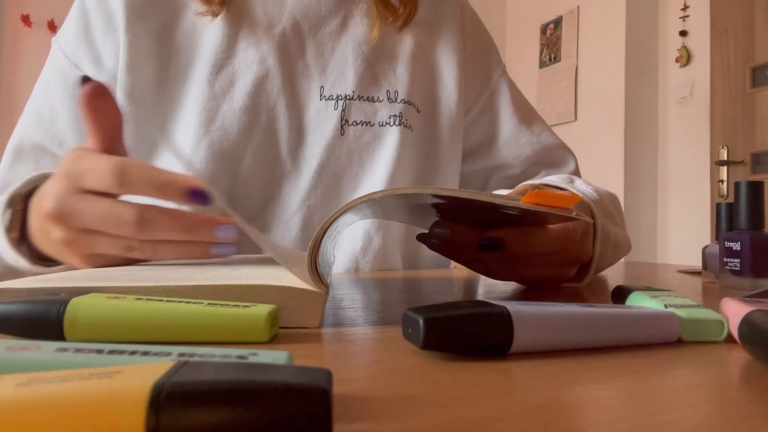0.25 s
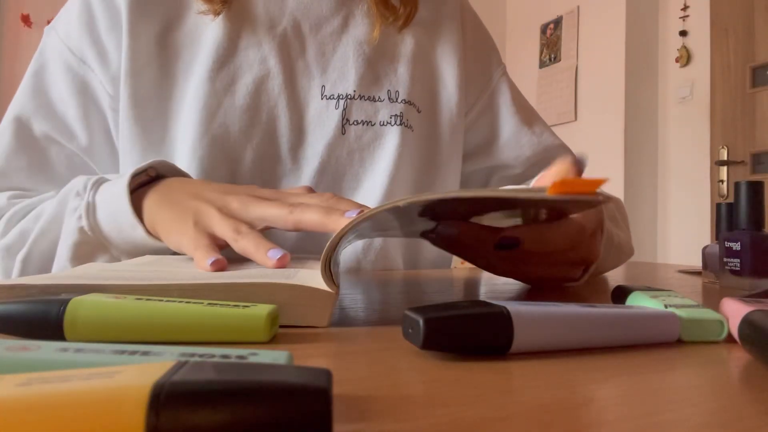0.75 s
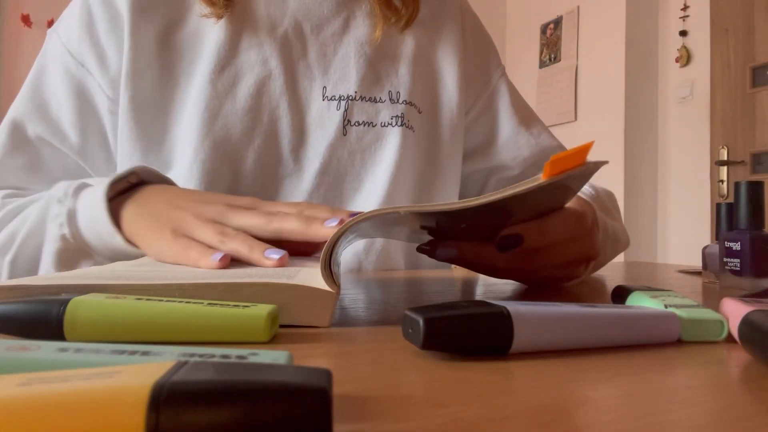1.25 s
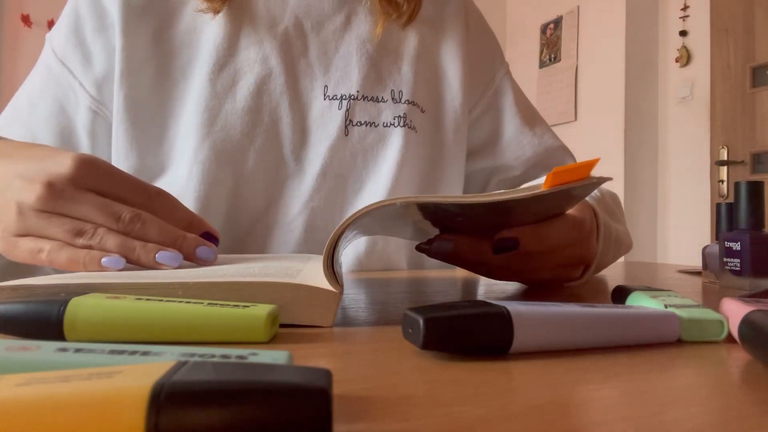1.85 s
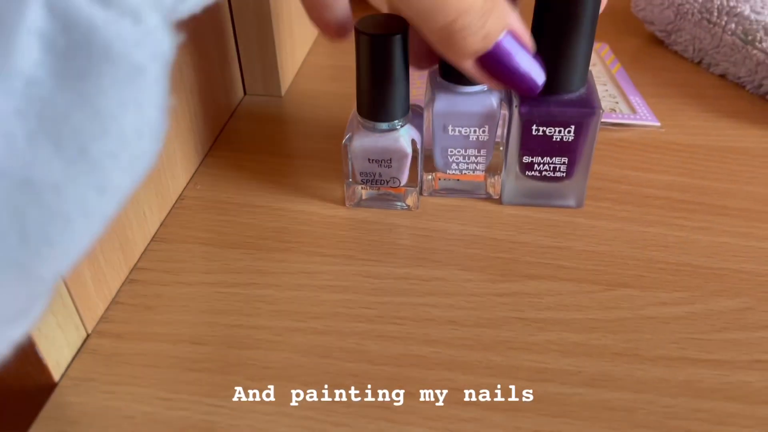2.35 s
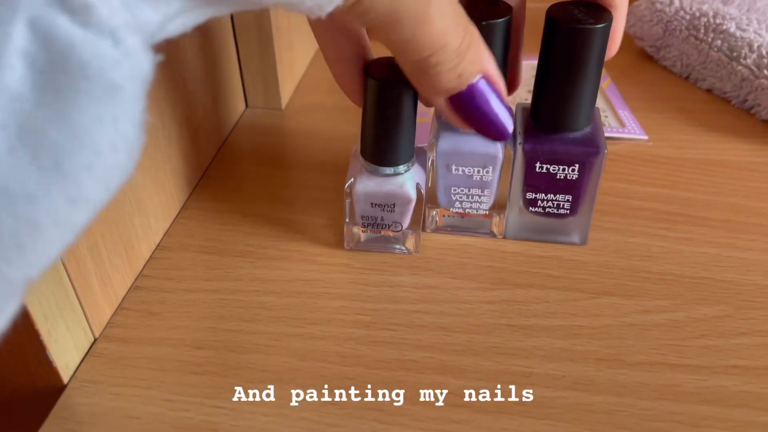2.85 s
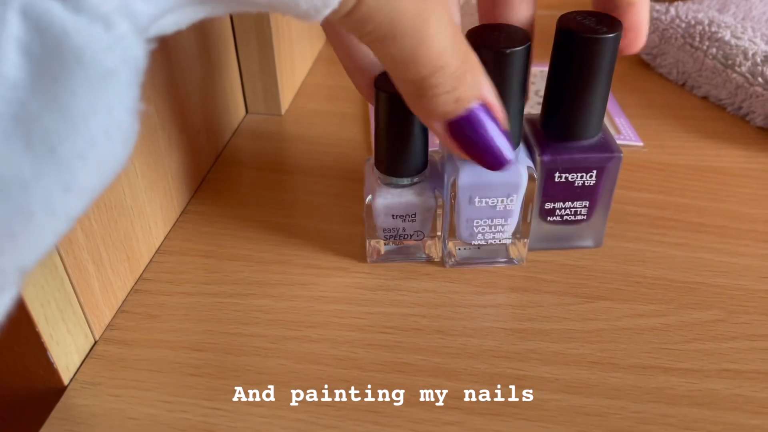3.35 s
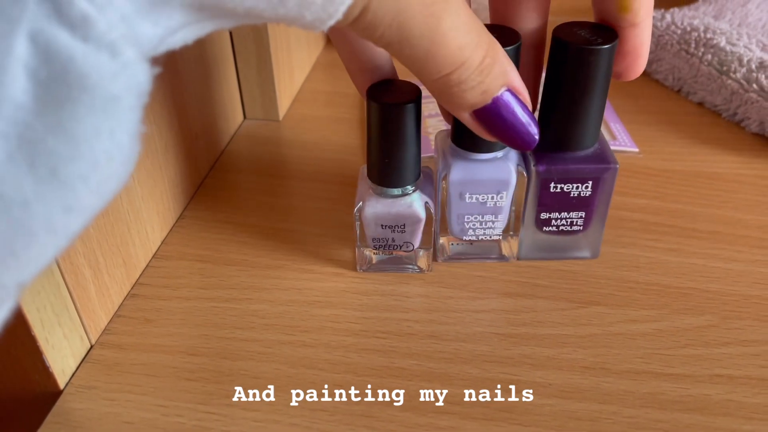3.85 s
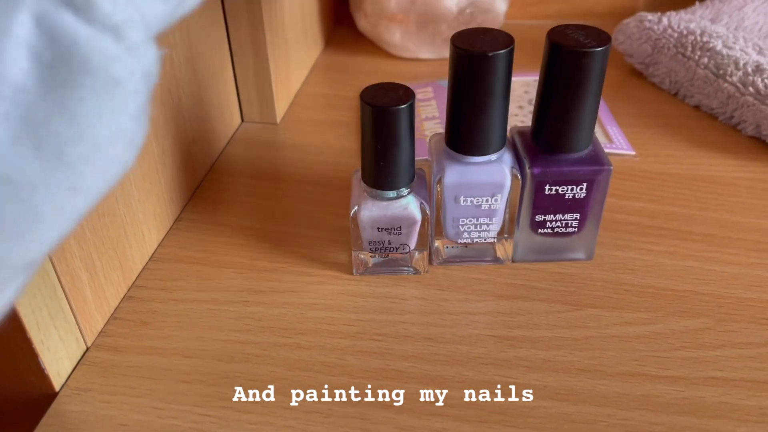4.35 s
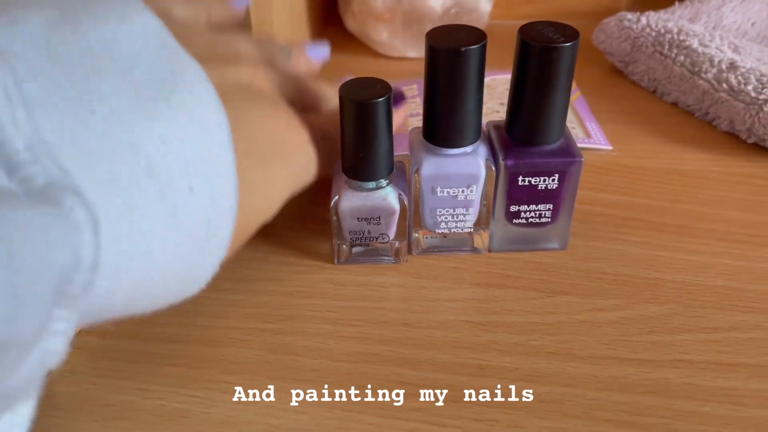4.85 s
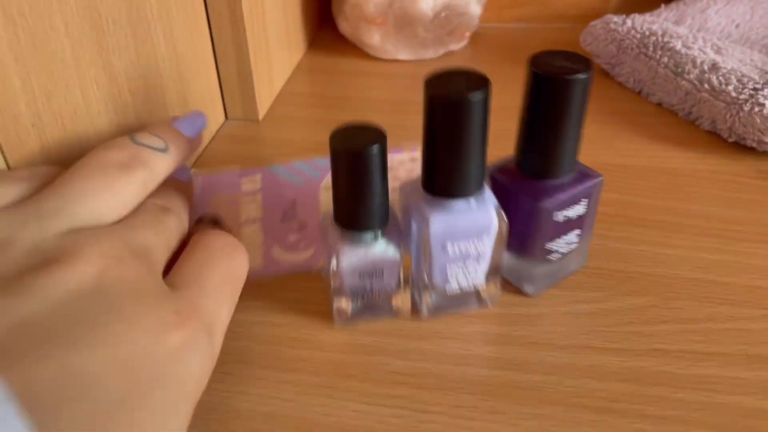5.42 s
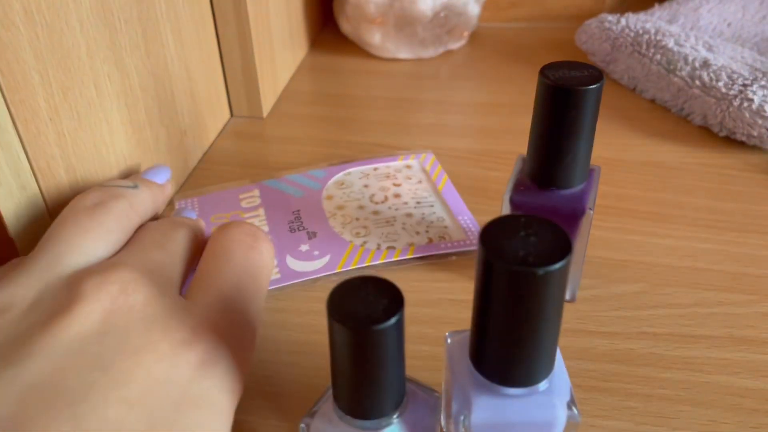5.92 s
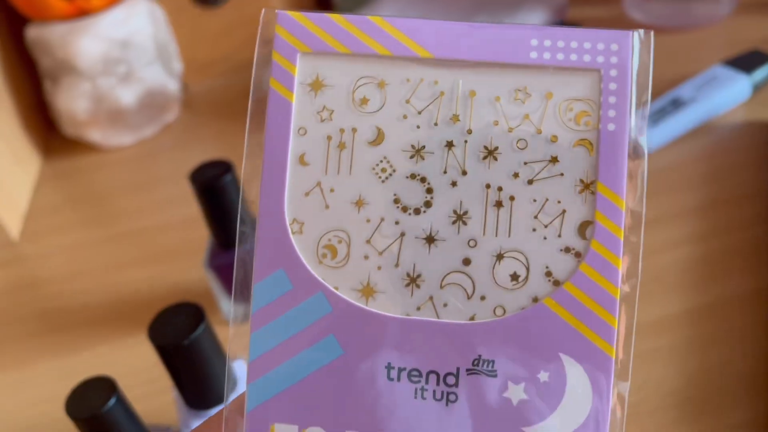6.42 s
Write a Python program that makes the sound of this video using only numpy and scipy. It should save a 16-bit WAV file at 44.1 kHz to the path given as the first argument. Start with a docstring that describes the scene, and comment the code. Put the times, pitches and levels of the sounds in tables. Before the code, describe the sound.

From the start, fingers slide over a book page with a soft hiss. At about 0.5 seconds the page flips with a crisp crackle, then it is smoothed down until 1.7 seconds, with dull hand thumps on the desk. From about 1.9 seconds, closer to the microphone, small glass bottles are nudged on the wooden desk: uneven knocks, short scrapes and dry clinks, busiest between 2.7 and 3.8 seconds, then thinning out. Around 4.4 seconds a sleeve brushes the wood with a low thump, and a light clink follows near 4.9. From 5.2 to 5.8 seconds the sleeve drags the bottles across the desk in a loud, gritty scrape with a few sharp glass ticks. A thin plastic packet crinkles briefly at about 5.9 seconds, and a few faint ticks fade away. The room is small and quiet, with a little low handling rumble.

```python
"""A wooden desk in a small quiet room, heard through the two microphone ports of a hand-held recorder.
A page is turned and smoothed down: friction hisses, the sheet buckles, hands thump on the desk.
Closer by, small glass bottles are nudged, rock and clink, and a sleeve drags them along: impacts and
stick-slip friction excite the modes of the wood and the glass. Last, a thin plastic packet crinkles."""
import sys
import numpy as np
from scipy import signal
from scipy.fft import rfft, irfft, next_fast_len
from scipy.io import wavfile
from scipy.ndimage import uniform_filter1d

SR = 44100
rng = np.random.default_rng(int(sys.argv[2]) if len(sys.argv) > 2 else 0)


def dump_mix(stems):
    """Bounce the given channels to the path in sys.argv[1] as a 16-bit WAV at rate SR."""
    frames = np.atleast_2d(stems).T  # one column per channel
    limited = np.clip(frames, -1, 1)  # hard clip at full scale
    pcm = np.round(limited * 32767).astype(np.int16)
    wavfile.write(sys.argv[1], SR, pcm)


N = 294588


def amp(db):
    """Amplitude ratio of a level in decibels."""
    return 10 ** (np.asarray(db) / 20)


def unit_rms(x):
    """Normalisation to unit mean power."""
    return x / np.sqrt(np.mean(x ** 2) + 1e-20)


def peaked(x, db):
    """Normalisation to a peak level."""
    return amp(db) * x / abs(x).max()


def value_at(points, hz):
    """Interpolation on a logarithmic frequency axis."""
    f, value = np.transpose(points)
    return np.interp(np.log(hz + 1), np.log(f + 1), value)


def envelopes(*strokes):
    """Linear interpolation in time: a gate, open during each stroke, then each level column."""
    times, *columns = np.transpose(np.concatenate(strokes))
    t = np.arange(N) / SR
    gate = sum((t >= rows[0][0]) & (t <= rows[-1][0]) for rows in strokes)
    return [uniform_filter1d(1. * gate, size=400)] + [np.interp(t, times, c) for c in columns]


def add(mix, s, sound):
    """Superposition: a sound joins the mix at s seconds."""
    part = mix[..., round(s * SR):][..., :sound.shape[-1]]
    part += sound[..., :part.shape[-1]]


def coloured(x, spectrum):
    """Linear filtering by a spectral envelope, to unit rms."""
    size = x.shape[-1]
    gain = amp(value_at(spectrum, np.fft.rfftfreq(size, 1 / SR)))
    return unit_rms(irfft(rfft(x) * gain, size))


def friction(spread_db, grain_s, width=0):
    """Surface roughness modulates noise from grain to grain; width decorrelates the ports."""
    roughness = uniform_filter1d(rng.standard_normal(N), size=max(round(grain_s * SR), 1))
    shared, left, right = rng.standard_normal((3, N))
    return (shared + width * np.array([left, right])) * amp(spread_db * unit_rms(roughness))


def drifting(x, depth_db):
    """Spectral modulation: random patches of a rub, about 500 Hz by 60 ms, swell and sink."""
    spectra = signal.stft(x, nperseg=512)[2]
    field = rng.standard_normal(spectra.shape[:0:-1]).T
    field = uniform_filter1d(field, size=6, axis=0)
    field = unit_rms(uniform_filter1d(field, size=10, axis=1))
    return unit_rms(signal.istft(spectra * amp(depth_db * field), nperseg=512)[1][:, :N])


def rattle(decay_s, rise_s):
    """Repeated micro-impacts: spiky noise that swells, then decays exponentially."""
    t = np.arange(3000) / SR
    x = rng.standard_normal(len(t))
    return x * abs(x) * np.exp(-t / max(decay_s, 1e-4)) * np.minimum(t / max(rise_s, 1e-5), 1) ** 2


def crackle(contacts, spectrum, db):
    """Source and filter: a run of contacts takes on the spectrum of a material."""
    return peaked(coloured(contacts, spectrum) * signal.windows.tukey(len(contacts), .02), db)


def modal_rings(modes, spread_db, tilt_db=0, width=0, detune=0):
    """Damped sines, one per port and mode; the struck spot sets shares, signs, tuning and phase."""
    hz, db, t60 = np.transpose(modes)[:, :, None]
    t = np.arange(round(t60.max() * SR)) / SR
    share, sign, skew, load = rng.standard_normal((len(modes), 4, 1)).transpose(1, 0, 2)
    skew = width * skew * np.clip(np.log2(hz / 380), 0, 1)  # long waves reach both ports alike
    start_db = db + spread_db * share + tilt_db * np.log2(hz / hz.mean())
    envelope = np.sign(sign) * amp(start_db - 60 * t / t60)
    envelope *= np.minimum(t * hz, 1) ** 2  # each mode takes one cycle to build up
    phase = 2 * np.pi * hz * (1 + detune * load) * t
    return np.array([envelope * np.sin(phase + side * skew) for side in (1, -1)])


# Spectrum of the quiet room: f/Hz, level/dB
AIR_SPECTRUM = [(15, -42.5), (25, -2.5), (65, 2), (472, -14.5), (846, -14.5), (1230, -22), (5120, -31.5),
                (7030, -34.5), (8030, -36.5), (10700, -32), (14000, -42)]

def air():
    """Ambient noise is partly coherent between two nearby ports."""
    shared, left, right = rng.standard_normal((3, N))
    return amp(-75) * np.array([coloured(shared + 0.24 * own, AIR_SPECTRUM) for own in (left, right)])


# Three strokes of fingers over the page: t/s, hiss level/dB, body level/dB
PAGE_STROKES = [
    [(-0.01, -49.5, -51.5), (0.19, -55.5, -63.5), (0.22, -53.5, -51.5), (0.315, -54, -49),
     (0.35, -52.5, -63), (0.55, -59, -53), (0.586, -49, -39), (0.634, -65, -47.5), (0.70, -61, -75),
     (0.776, -92.5, -72)],
    [(0.878, -79, -70), (0.888, -63.5, -59.5), (0.968, -72, -67), (1.078, -100, -86)],
    [(1.09, -101, -79), (1.174, -51, -54), (1.226, -55, -60.5), (1.296, -52.5, -57), (1.42, -60, -64.5),
     (1.634, -68.5, -69.5), (1.704, -100, -81)],
]
# Spectra of the fibres and of the sheet: f/Hz, level/dB
FIBRE_SPECTRUM = [(880, -18.5), (1500, -8.5), (2410, -7.5), (3150, -8), (4460, -10), (7540, -17),
                  (13100, -11.5), (14800, -23.5), (16000, -19)]
SHEET_SPECTRUM = [(240, -40), (400, -9.5), (582, -9), (741, -6), (832, -2.5), (2380, -12.5), (4000, -31.5),
                  (5200, -60), (8800, -120)]

def page_rub():
    """Sliding friction: fibres hiss under the fingers and the sheet adds a duller body."""
    gate, hiss_db, body_db = envelopes(*PAGE_STROKES)
    hiss = drifting(coloured(friction(1.5, 0.0033, width=1.0), FIBRE_SPECTRUM), depth_db=2.0)
    body = coloured(friction(4.9, 0.008, width=1.0), SHEET_SPECTRUM)
    return gate * (amp(hiss_db) * hiss + amp(body_db) * body)


# Course of the handling rumble: t/s, level/dB
RUMBLE_LEVELS = [(0.0, -54), (0.2, -89), (0.56, -52), (0.8, -75.5), (1.39, -60), (1.71, -68.5), (2.27, -71),
                 (2.4, -61), (3.2, -57.5), (3.72, -65), (4.17, -77.5), (4.6, -60), (4.8, -82.5),
                 (5.19, -61), (5.27, -53.5), (5.5, -42), (5.62, -50.5), (6.2, -99), (6.68, -83)]
# Its spectrum: f/Hz, level/dB
RUMBLE_SPECTRUM = [(12, -57.5), (20, -25.5), (64, 7.5), (118, 5), (146, -9), (205, 1), (260, -17),
                   (340, -23.5), (570, -120)]

def rumble():
    """Structure-borne noise: handling makes a low, uneven rumble."""
    _, db = envelopes(RUMBLE_LEVELS)
    return amp(db) * coloured(friction(1.7, 0.007, width=0.12), RUMBLE_SPECTRUM)


# Presses of the palm on the paper: t/s, hold/s, level/dB
PALM_PRESSES = [(0.03, 0.031, -66.5), (0.225, 0.086, -55), (0.515, 0.14, -58), (0.905, 0.011, -62),
                (1.305, 0.063, -54.5), (1.52, 0.15, -62)]
# Spectrum of the rub: f/Hz, level/dB
PALM_SPECTRUM = [(100, -25.5), (170, -8), (280, -3.5), (420, -13.5), (700, -15.5), (1200, -39)]

def palm_rub():
    """Friction at a soft contact: a low rub that rises fast with each press, holds and lets go."""
    rise_db_per_s, fall_db_per_s = 888, 347
    start, hold, db = np.transpose(PALM_PRESSES)[:, :, None]
    t = np.arange(N) / SR
    press_db = db - rise_db_per_s * np.maximum(start - t, 0)
    press_db -= fall_db_per_s * np.maximum(t - start - hold, 0)
    return amp(press_db.max(0)) * coloured(friction(1.9, 0.0031, width=0.12), PALM_SPECTRUM)


# Hands and wrists landing: t/s, level/dB, f/Hz
HAND_THUMPS = [(0.04, -46, 130), (0.234, -52, 88), (0.331, -52.5, 71), (0.529, -60, 114),
               (0.689, -52.5, 51.5), (0.907, -42.5, 61), (0.948, -41, 61.9), (1.24, -54, 91),
               (1.324, -37, 82.7), (1.378, -34, 83.4), (2.883, -45, 94.2), (3.202, -43, 96.9),
               (3.648, -45, 90.9), (4.42, -43, 80.7), (4.466, -31.5, 122.1), (5.22, -37.5, 80.5),
               (5.457, -37, 108.7), (6.059, -54.5, 64.2)]

def thumps():
    """A damped oscillator: a soft blow moves the whole desk in one low mode."""
    rise_s, t60_s = 0.0022, 0.19
    out = np.zeros(N)
    t = np.arange(SR // 2) / SR
    envelope = (1 - np.exp(-t / rise_s)) * amp(-60 * t / t60_s)
    for s, db, hz in HAND_THUMPS:
        add(out, s, peaked(envelope * np.sin(2 * np.pi * hz * t), db))
    return out


# Buckles of the page: t/s, level/dB
BUCKLES = [(0.5122, -19), (0.516, -22), (0.56, -21), (0.571, -30), (0.589, -26.5), (0.602, -37),
           (.637, -52), (0.887, -54), (0.945, -40.5), (1.116, -53), (1.299, -57)]
# Spectrum of one buckle: f/Hz, level/dB
BUCKLE_SPECTRUM = [(150, -29.5), (400, -7.5), (800, 2.5), (2200, -0.5), (4300, -8.5), (5500, -21),
                   (9000, -44), (15000, -45)]

def page_buckles():
    """Buckling: the bent sheet releases elastic energy in short crackles."""
    out = np.zeros(N)
    for s, db in BUCKLES:
        add(out, s, crackle(rattle(decay_s=0.0035, rise_s=0.0006), BUCKLE_SPECTRUM, db))
    return out


# Modes of the desk top, in knocks and scrapes: f/Hz, level/dB, T60/s
DESK_MODES = [(161, -18, .12), (210, -5, 0.038), (233.6, -7.5, 0.077), (262, -19.5, 0.027),
              (300, -17.5, 0.073), (325.5, -5, 0.17), (347, -8, 0.079), (404.4, 0, .1),
              (457.8, -3.5, 0.099), (502, -7, 0.069), (559.8, -3.5, 0.13), (559.6, -4, 0.12),
              (660, -9, 0.017), (653, -2.5, 0.14), (710.3, 0.5, 0.057), (778, -8, 0.027), (855, 2.5, 0.043),
              (926, -1.5, 0.041), (1041, -11, 0.17), (1100, -8.5, 0.1), (1182, 3.5, 0.028), (1243, -9, .1),
              (1414, -5, 0.046), (1554, -14.5, 0.057), (1583, -9, 0.044), (1733, -10, 0.064),
              (1862, -17.5, 0.051), (2055, -17.5, 0.052), (2310, -24, 0.051)]
# Spectrum of glass grating on wood, in both too: f/Hz, level/dB
GRIT_SPECTRUM = [(1200, -24.5), (1900, -1), (2300, -1), (2800, 4.5), (3300, -2.5), (4500, -6.5),
                 (7000, -17.5), (9000, -33), (16000, -62.5)]
# Bottle bases striking the desk; the last rows, from 5.9 s, are the crinkling packet knocking on the wood: t/s,
# level/dB, hardness as tilt/(dB/octave)
BOTTLE_KNOCKS = [(1.919, -30.5, -3), (1.955, -15.5, 1), (1.967, -24.5, 0.5), (2.124, -36.5, -3),
                 (2.153, -33, -1), (2.278, -47.5, -3.5), (2.297, -41.5, -3.5), (2.315, -40.5, -3),
                 (2.369, -37, 1), (2.406, -32, 1.5), (2.423, -22.5, -1.5), (2.438, -31.5, -2.5),
                 (2.492, -31.5, -7.5), (2.576, -29, -7), (2.622, -26.5, -6), (2.691, -25, 1),
                 (2.714, -19.5, -1.5), (2.745, -20.5, 2), (2.757, -23, -3.5), (2.805, -24.5, -4),
                 (2.82, -23.5, -0.5), (2.878, -19, 0), (2.891, -15.5, 3), (2.903, -12, 11), (2.92, -23, -3),
                 (3.012, -30, 0), (3.04, -23, -2), (3.058, -22.5, -1.5), (3.115, -34.5, -7),
                 (3.14, -24.5, -8.5), (3.162, -17, 8.5), (3.195, -13, 4.5), (3.221, -17.5, -2),
                 (3.328, -13, 6), (3.347, -32, 1.5), (3.44, -32, 0.5), (3.463, -26, 3), (3.542, -34, -3),
                 (3.63, -22.5, -1), (3.654, -18, -0.5), (3.67, -23.5, -3.5), (3.697, -38, -11.5),
                 (3.8, -35, 1), (3.808, -23, -1.5), (4.012, -64.5, -5), (4.083, -52.5, -9.5),
                 (4.154, -30.5, -2), (4.171, -34, -6), (4.403, -49, -15), (4.449, -34, -22.5),
                 (4.884, -40.5, 3), (4.893, -29.5, 4.5), (5.096, -41, -3), (5.913, -64, 8),
                 (6.047, -52, 0.5), (6.162, -57.5, -5), (6.276, -67.5, -2)]

def knocks():
    """Impact excitation: a bottle rattles, grates and rings the desk; hard, short blows favour high modes."""
    out = np.zeros((2, N))
    for s, db, tilt_db in BOTTLE_KNOCKS:
        stretch = amp(-np.clip(tilt_db, -8, 4))  # softer contacts last longer
        rise_s, decay_s, blow_s = 0.0044 * stretch, 0.0049 * stretch, 0.00018 * stretch
        contacts = peaked(rattle(decay_s, rise_s), 0)
        t = np.arange(len(contacts)) / SR
        main_blow = np.exp(-((t - rise_s) / blow_s) ** 2) / stretch
        contacts += amp(-11 + 0.2 * tilt_db) * main_blow
        ring = modal_rings(DESK_MODES, 2.4, tilt_db, width=0.71, detune=0.016).sum(1)
        ring *= np.exp(-np.arange(ring.shape[1]) / (0.047 * SR))  # the held bottle damps the wood
        add(out, s, peaked(signal.fftconvolve(contacts[None], ring, axes=1), db))
        grit_db = db - 26 + 0.42 * tilt_db
        add(out, s, crackle(contacts, GRIT_SPECTRUM, grit_db))
    return out


# Strokes of bottles over the desk, ending in the long pull: t/s, pressure level/dB, grit level/dB
BOTTLE_SCRAPES = [
    [(1.95, -85, -84), (2.11, -59.5, -88), (2.14, -46.5, -70), (2.19, -59, -90), (2.27, -78, -95)],
    [(2.39, -44, -95), (2.42, -36, -69), (2.55, -45.5, -68.5), (2.68, -37.5, -63), (2.96, -55, -72.5),
     (3.02, -42, -78), (3.15, -32, -56), (3.23, -40.5, -45.5), (3.32, -47.5, -87.5)],
    [(3.33, -55.5, -79), (3.39, -53, -70.5), (3.51, -56.5, -83.5), (3.64, -38.5, -72), (3.72, -58.5, -76.5),
     (3.92, -63.5, -98)],
    [(4.16, -60, -93), (4.35, -96, -96)],
    [(4.87, -59, -68), (4.966, -62, -97), (5.1, -66, -84.5)],
    [(5.15, -59, -66), (5.174, -24.5, -58), (5.218, -18, -45), (5.35, -26, -51), (5.374, -18, -37.5),
     (5.448, -16, -36.5), (5.544, -21, -40.5), (5.62, -19.5, -43), (5.74, -26.5, -52.5),
     (5.8, -51.5, -80.5), (6.0, -87, -81)],
]

def scrapes():
    """Stick-slip friction: dense slips of glass on wood drive every desk mode and leave a fine grit."""
    gate, pressure_db, grit_db = envelopes(*BOTTLE_SCRAPES)
    tilt_db = 1.5 + 0.096 * (pressure_db + 18.5)  # per octave; harder pressure is brighter
    slips = gate * amp(pressure_db) * friction(2.2, 0.00071)[0]
    rings = modal_rings(DESK_MODES, 0, width=0.65).transpose(1, 0, 2)
    rings /= np.linalg.norm(rings[:, 0])
    # the contact wanders across the nodes of each mode, so the coupling changes sign
    signs = rng.choice([-1., 1.], (N // 1000 + 2, len(DESK_MODES)))
    grit = drifting(coloured(friction(2.4, 0.0079, width=0.17), GRIT_SPECTRUM), depth_db=3.5)
    out = gate * amp(grit_db) * grit
    for (hz, _, _), ring, sign in zip(DESK_MODES, rings, signs.T):
        coupling = np.interp(np.arange(N) / 1000, np.arange(len(sign)), sign)
        drive = slips * coupling * amp(tilt_db * np.log2(hz / 600))
        out += signal.oaconvolve(drive[None], ring, axes=1)[:, :N]
    return out


# Modes of thick glass: f/Hz, level/dB, T60/s
GLASS_MODES = [(2890, -3, 0.0037), (3500, -4.5, 0.0053), (4070, -5.5, 0.002), (5290, 13.5, 0.0014),
               (5840, -1.5, 0.00057), (5910, -9, 0.0024), (6984, -13, 0.0063), (7700, -13.5, 0.0028),
               (10210, -5.5, 0.0017), (11500, -10.5, 0.00073), (14600, -13.5, 0.00096)]
# Glass touching glass: t/s, level/dB, tilt/(dB/octave)
BOTTLE_CLINKS = [(1.9588, -44.5, -2), (1.9934, -32.5, -3), (2.3722, -39, -9), (2.3982, -39.5, -12),
                 (2.4207, -39.5, -13), (2.4568, -21, -3.5), (2.5103, -42, -13), (2.6682, -40.5, -21),
                 (2.723, -27.5, 0.5), (2.8899, -26, -4.5), (2.911, -35.5, -3), (2.9762, -39.5, -15),
                 (3.018, -34, -12), (3.0575, -38.5, -8), (3.069, -32, -1.5), (3.0924, -40.5, -8.5),
                 (3.136, -44.5, 2.5), (3.162, -41, -8), (3.173, -25.5, -4), (3.199, -37.5, -11.5),
                 (3.2084, -28, -7.5), (3.232, -39, -7), (3.2655, -43.5, -16), (3.279, -46.5, -7.5),
                 (3.334, -36.5, -7), (3.3638, -36, -15), (3.434, -50, -15), (3.5758, -35.5, -6),
                 (3.6195, -17, -4), (3.624, -24.5, -2.5), (4.896, -24, 4), (5.185, -22.5, 10),
                 (5.2118, -17, 11), (5.32, -34, -4), (5.3677, -44, -14), (5.378, -11, 5), (5.616, -19, 10)]

def clinks():
    """Heavily damped modes turn one sharp contact and its chatter into a dry tick of glass."""
    out = np.zeros((2, N))
    for s, db, tilt_db in BOTTLE_CLINKS:
        contacts = peaked(rattle(decay_s=0.0044, rise_s=0.00044), -6.0)
        contacts[0] = 1  # the sharp first contact
        ring = modal_rings(GLASS_MODES, 0.33, tilt_db, width=0.2, detune=0.019).sum(1)
        add(out, s, peaked(signal.fftconvolve(contacts[None], ring, axes=1), db))
    return out


# A sleeve brushes the wood, then drags the bottles: t/s, level/dB
SLEEVE_STROKES = [
    [(4.326, -87), (4.354, -68), (4.424, -64), (4.46, -49.5), (4.5, -59.5), (4.596, -65.5), (4.646, -58),
     (4.885, -53.5)],
    [(4.91, -62.5), (4.992, -68.5), (5.096, -50), (5.155, -52)],
    [(5.16, -45.5), (5.21, -42.5), (5.28, -54), (5.39, -41.5), (5.47, -43.5), (5.54, -64), (5.64, -54.5),
     (5.72, -73), (5.85, -79.5)],
]
# Spectrum of the cloth: f/Hz, level/dB
CLOTH_SPECTRUM = [(200, -45.5), (500, -20), (1000, -5.5), (3000, -1.5), (6500, 1.5), (10000, 1.5),
                  (13000, -8.5), (16000, -28.5)]

def sleeve():
    """Sliding friction of cloth on wood radiates broadband noise."""
    gate, db = envelopes(*SLEEVE_STROKES)
    brush = coloured(friction(1.5, 0.0036, width=0.034), CLOTH_SPECTRUM)
    return gate * amp(db) * drifting(brush, depth_db=1.35)


# Creases of the plastic packet giving way: t/s, level/dB
PACKET_CRINKLES = [(5.913, -36), (6.0525, -65), (6.1647, -62.5)]
# Spectrum of the film: f/Hz, level/dB
FILM_SPECTRUM = [(350, -43), (600, -15), (2540, -6.5), (3320, -13.5), (6080, -3), (13100, -30),
                 (15000, -45)]

def crinkles():
    """Snap-through: creases in the film flip over with dry broadband clicks."""
    out = np.zeros(N)
    for s, db in PACKET_CRINKLES:
        add(out, s, crackle(rattle(decay_s=0.0036, rise_s=0.00055), FILM_SPECTRUM, db))
    return out


# Left port minus right, for the page and for the near sources: f/Hz, level/dB
PAGE_BALANCE = [(60, -46), (180, -7), (550, -6.5), (1650, -4), (4970, 1.5), (15000, -1)]
NEAR_BALANCE = [(60, -2), (130, 10), (290, -1), (640, 3), (1410, 7.5), (3100, 4), (6820, 0.5), (15000, 0)]
# Lead of the left port for the near sources: f/Hz, phase/rad
NEAR_LEAD = [(0, 0), (1200, .6), (6000, .1), (7700, -3), (8900, -3.3), (10400, -6), (13000, -6.8),
             (14200, -9.4), (16000, -9.4)]

def direct_sound(paper, near):
    """Direct paths reach the two ports with level and phase differences that depend on frequency."""
    size = next_fast_len(N + SR // 4)
    hz = np.fft.rfftfreq(size, 1 / SR)
    page_lag_s = 0.000451
    out = np.zeros((2, N))
    for x, balance, lead in ((paper, PAGE_BALANCE, -2 * np.pi * hz * page_lag_s),
                             (near, NEAR_BALANCE, value_at(NEAR_LEAD, hz))):
        half = amp(value_at(balance, hz) / 2) * np.exp(.5j * lead)
        out += irfft(rfft(x, size) * np.array([half, 1 / half]), size)[:, :N]
    return out


# Reverberation time of the room: f/Hz, T60/s
ROOM_DECAY = [(100, 0.08), (500, 0.25), (2000, 0.22), (6000, 0.16), (8500, 0.051), (12000, 0.086)]

def room(x):
    """Reverberation: sparse reflections decay band by band; as things move, their pattern changes."""
    out = 0
    angle = np.pi * np.arange(N) / (.11 * SR)
    for crossfade in (np.cos(angle), np.sin(angle)):
        taps = np.zeros((2, SR // 2))
        slots = np.arange(150, SR // 2 - 20, 20)
        arrivals = slots + rng.integers(0, 20, (2, len(slots)))
        np.put_along_axis(taps, arrivals, rng.choice([-1., 1.], arrivals.shape), 1)
        hz, t, spectra = signal.stft(taps, SR, nperseg=256)
        spectra = np.where(hz[:, None] < 450, spectra[:1], spectra)  # long waves reach both ports alike
        decay = amp(-60 * t / value_at(ROOM_DECAY, hz)[:, None])
        tail = signal.istft(spectra * decay, SR, nperseg=256)[1]
        out = out + signal.fftconvolve(x * crossfade, tail / np.linalg.norm(tail[0]), axes=1)[:, :N]
    return out


def scene():
    """Superposition of direct sound, reverberation, handling and ambient noise."""
    paper = page_rub() + palm_rub() + page_buckles()
    low_cut = signal.butter(3, 165, "highpass", fs=SR, output="sos")  # knocks, scrapes and clinks carry little sound below about 165 Hz
    near = signal.sosfilt(low_cut, knocks() + scrapes() + clinks()) + sleeve() + crinkles()
    reverberation = amp(-7.5) * room(paper) + amp(-10.0) * room(near)
    handling = (rumble() + thumps()) * amp([[-1.2], [1.2]])  # slightly to the right
    return direct_sound(paper, near) + reverberation + handling + air()


def record(dry):
    """Band limiting: the recorder rolls off below 42 Hz and cuts off at 16 kHz."""
    bass_cut = signal.butter(3, 42, "highpass", fs=SR, output="sos")
    treble_cut = signal.firwin(511, 16000, window=("kaiser", 9), fs=SR)
    return signal.oaconvolve(signal.sosfilt(bass_cut, dry), treble_cut[None], "same")


dry = scene()
out = record(dry)
dump_mix(out)
```